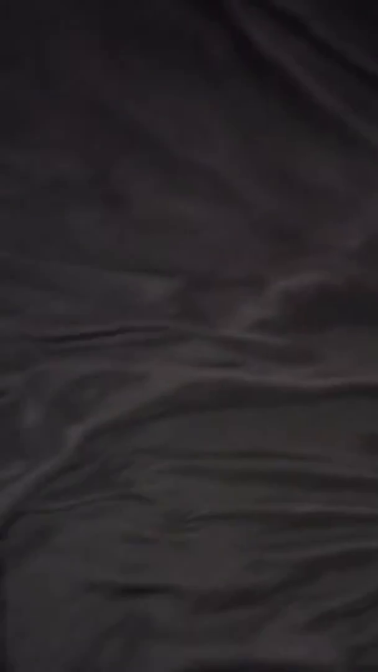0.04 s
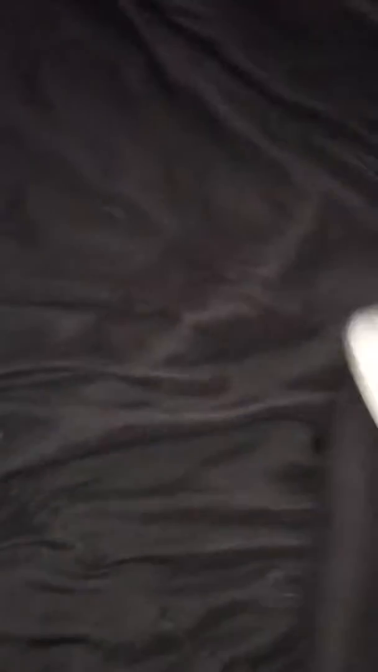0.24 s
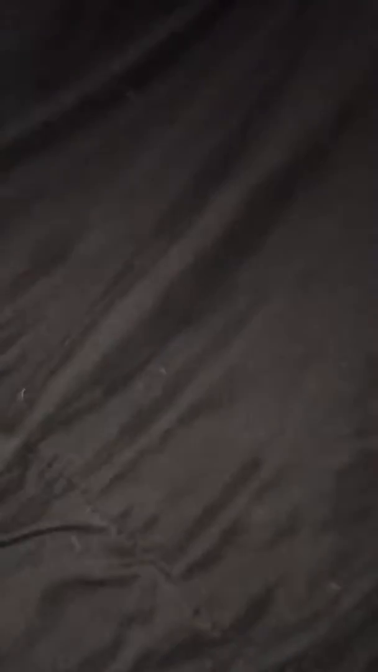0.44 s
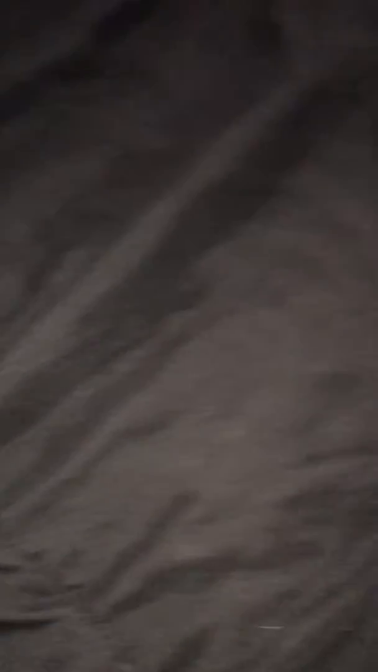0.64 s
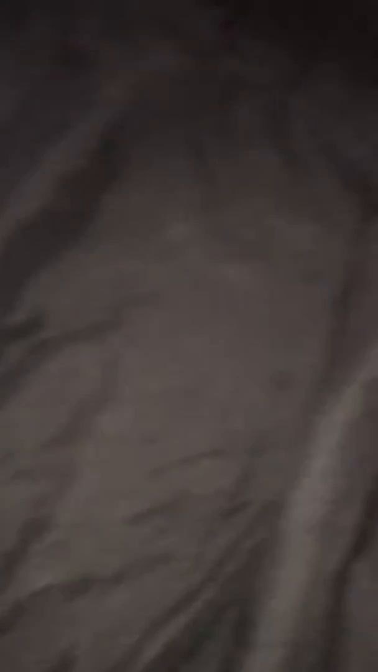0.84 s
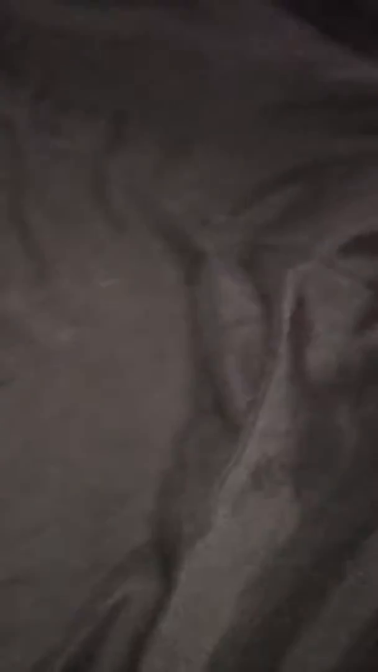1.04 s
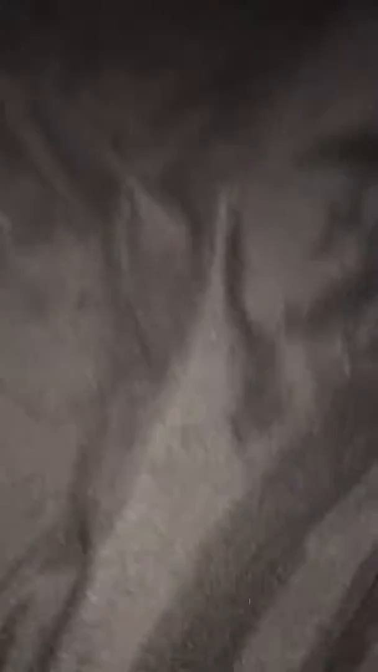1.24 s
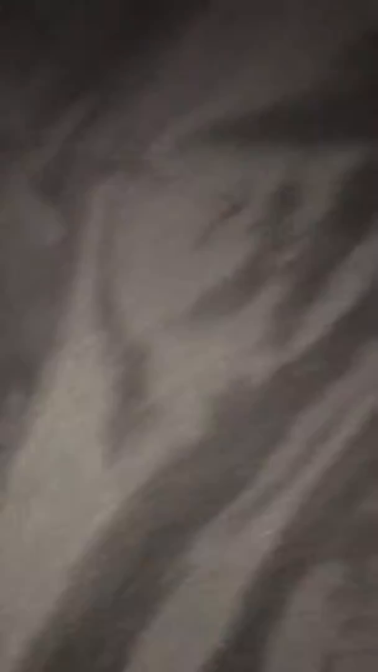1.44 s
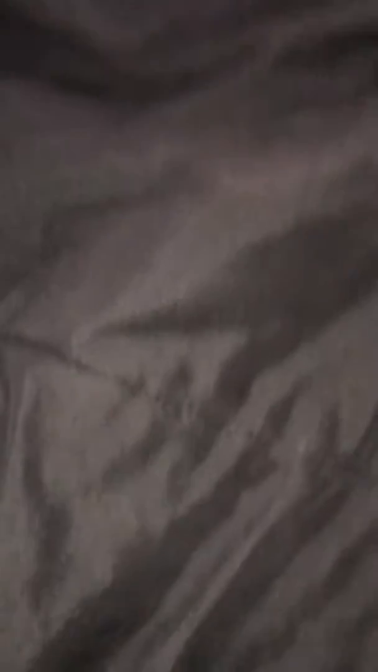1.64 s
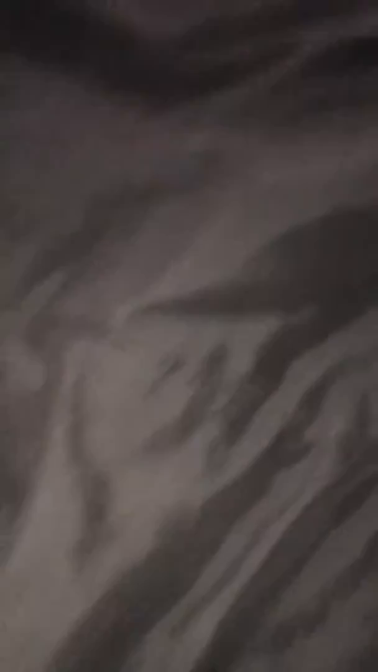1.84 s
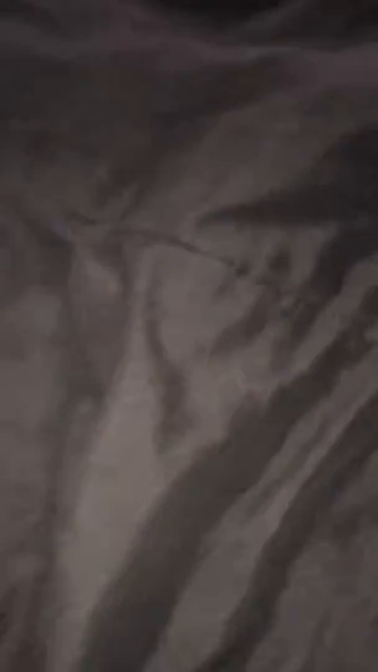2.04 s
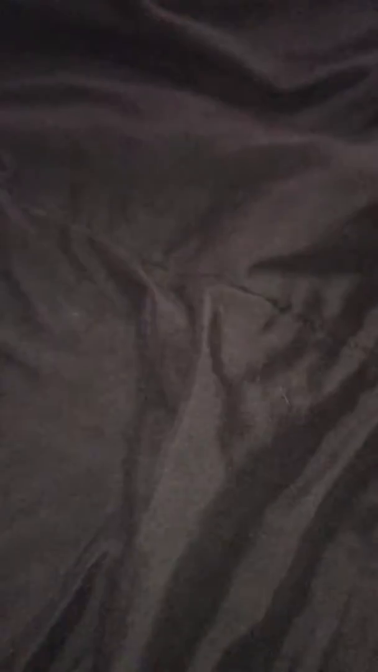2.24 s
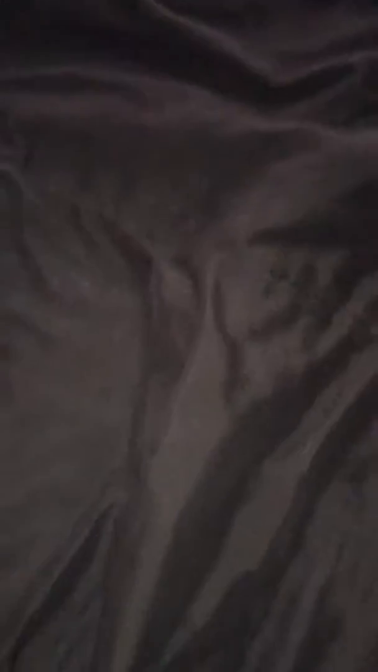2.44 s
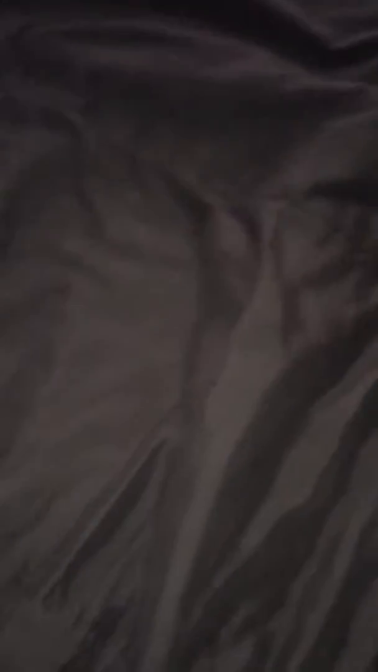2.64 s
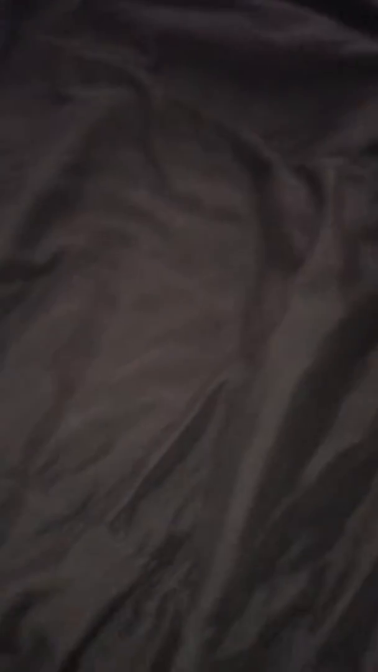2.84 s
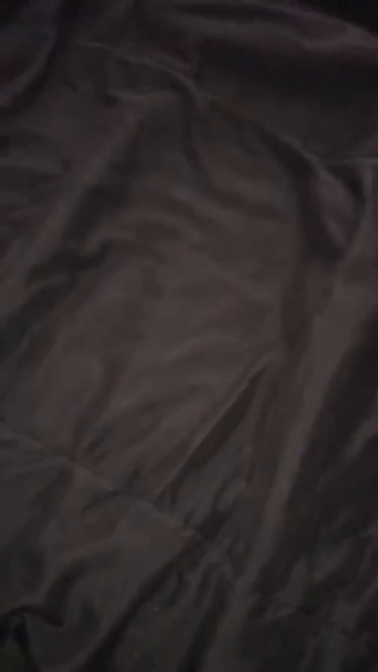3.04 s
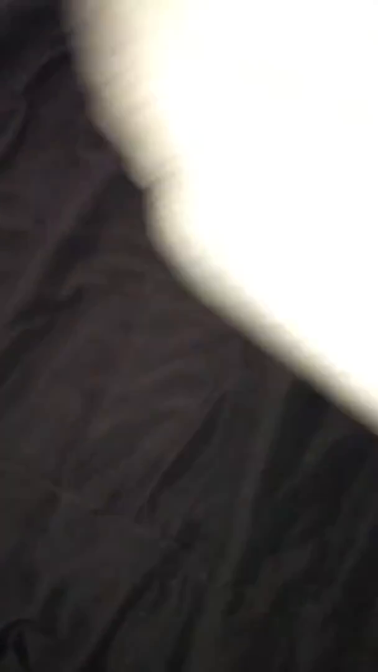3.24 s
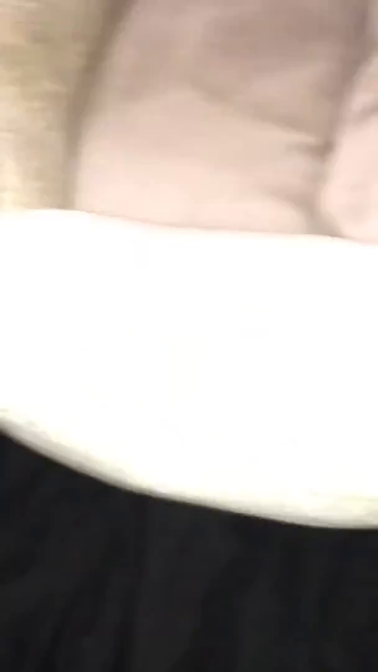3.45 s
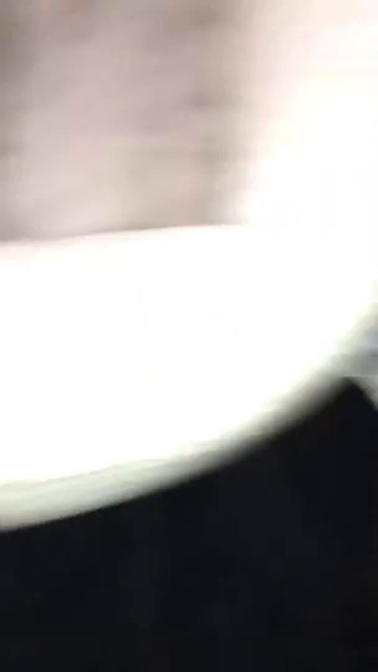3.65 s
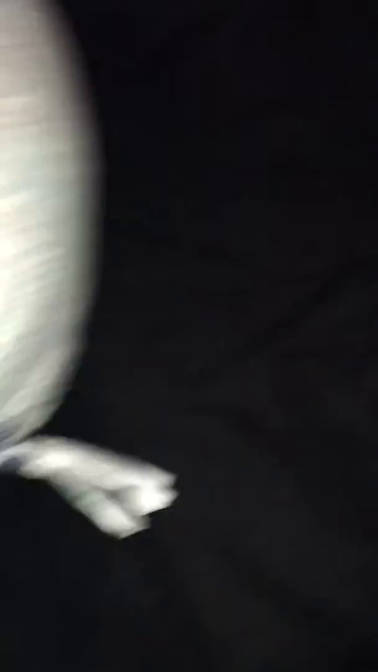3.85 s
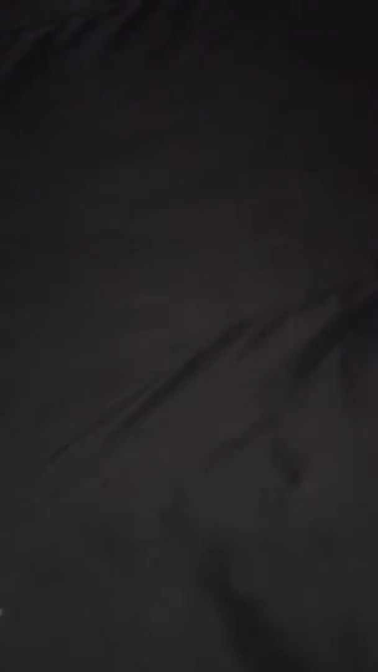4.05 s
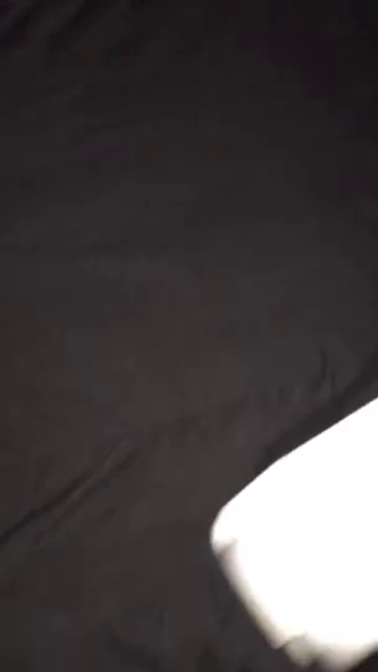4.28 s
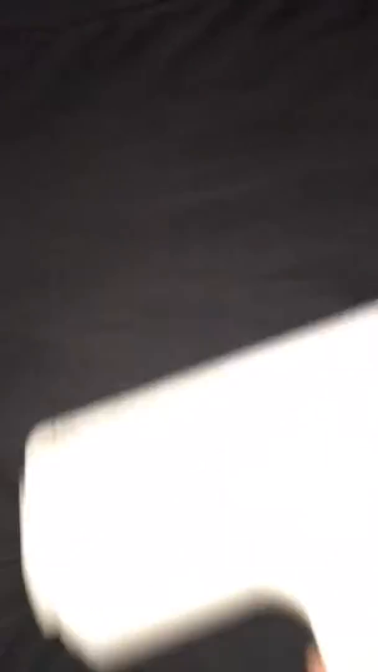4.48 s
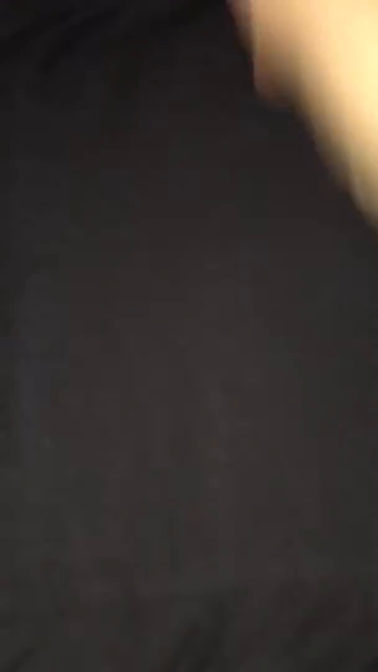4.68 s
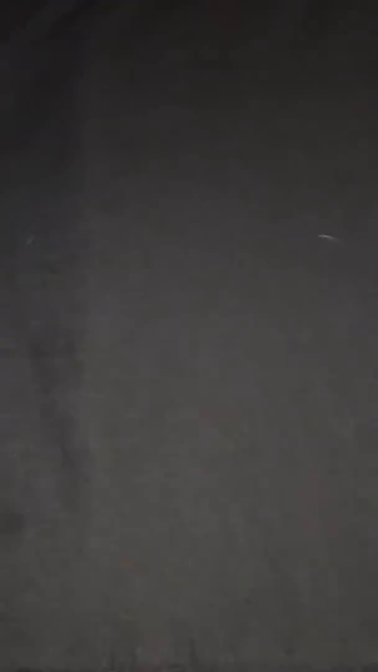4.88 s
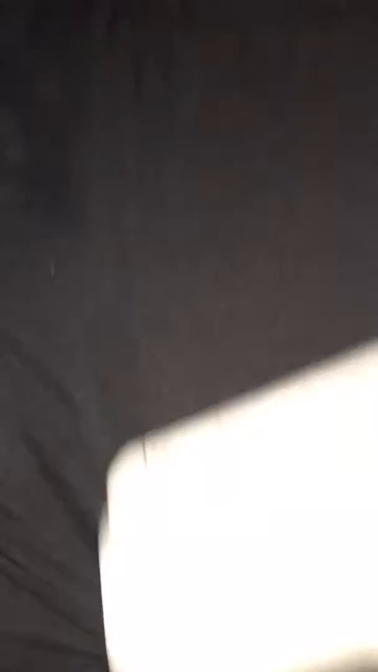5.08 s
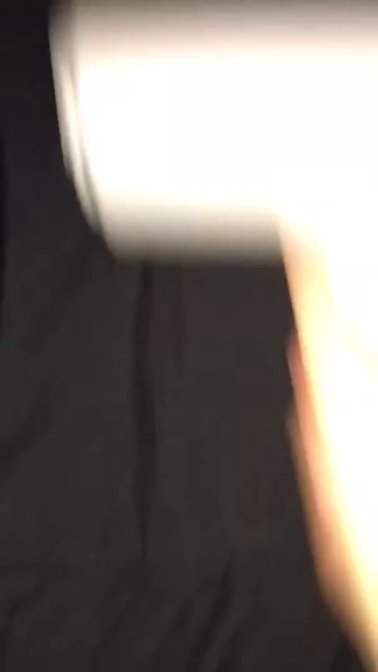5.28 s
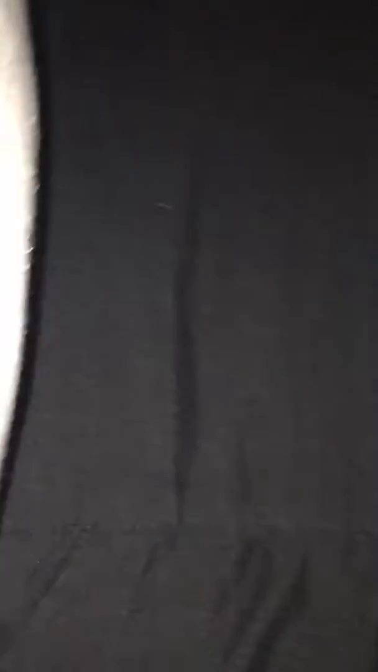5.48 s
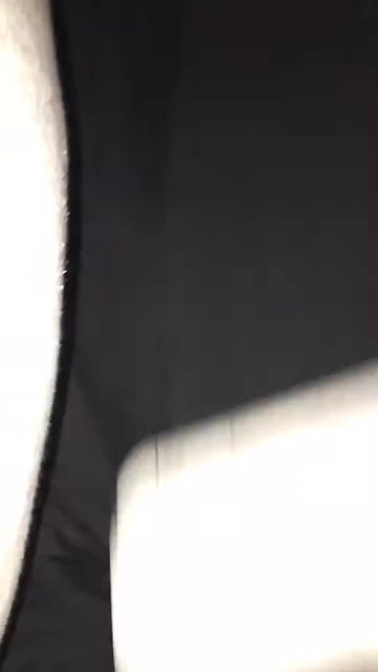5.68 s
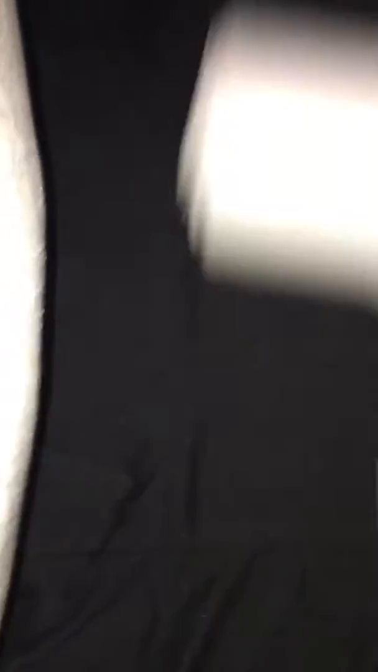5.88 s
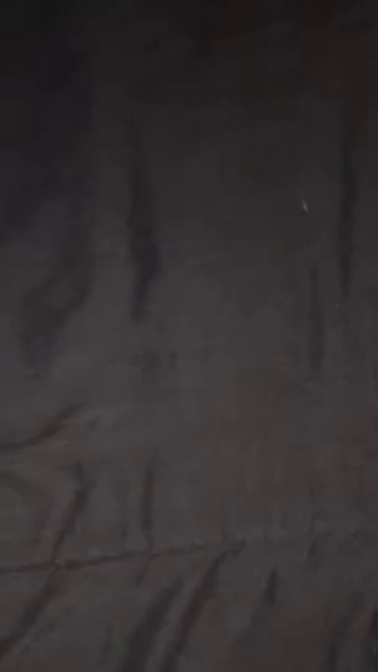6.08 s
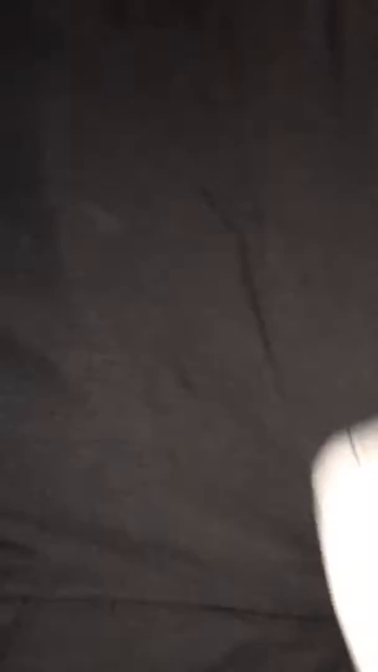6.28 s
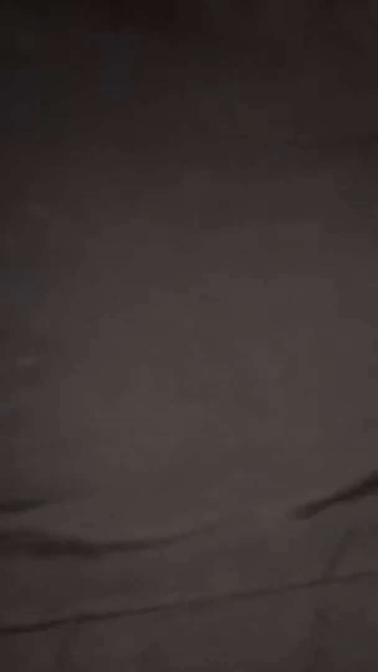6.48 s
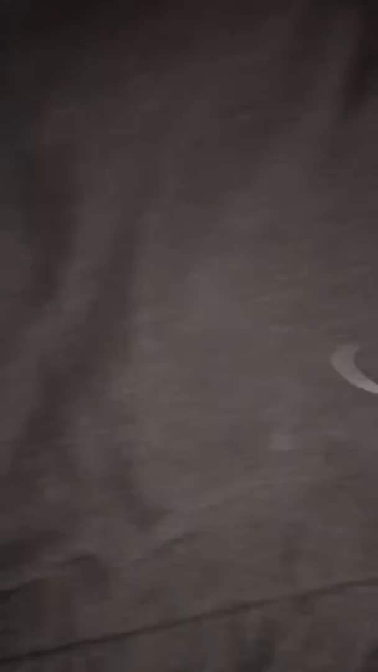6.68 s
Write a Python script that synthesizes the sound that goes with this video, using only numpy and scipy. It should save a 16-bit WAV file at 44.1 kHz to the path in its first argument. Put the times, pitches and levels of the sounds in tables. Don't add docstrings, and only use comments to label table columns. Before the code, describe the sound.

Very close in a quiet, soft bedroom, a hollow plastic lint remover is pushed back and forth over cloth. Each turn gives a sharp, dry clack; between turns come velvety scraping, bumping creases and gritty hiss. After about two and a half seconds it nearly stops, leaving faint hum, small ticks, a cushion rustle and soft thuds. Then faster, louder strokes resume until the end.

```python
import sys
import numpy as np
from scipy import signal
from scipy.fft import rfft, irfft
from scipy.io import wavfile
from scipy.ndimage import uniform_filter1d

SR = 44100
rng = np.random.default_rng(int(sys.argv[2]) if len(sys.argv) > 2 else 0)


def store_pcm(level_fs):
    pcm = np.round(np.clip(level_fs, -1, 1) * 32767).astype(np.int16)
    wavfile.write(sys.argv[1], SR, np.atleast_2d(pcm).T)


def decibels_to_gain(level_db):
    exponent = np.asarray(level_db, float) / 20
    return 10 ** exponent


N = 296352

# pitch_hz, level_db, t60_s
CAVITY_MODES = [(449, 8, 0.004), (653, 11.5, 0.01), (877, -8.5, 0.023)]
WALL_MODES = [(1063, 1.5, 0.0084), (1317, -0.8, 0.023), (1480, -2, 0.0089), (1740, 2.5, 0.011),
              (1940, 1.3, 0.0095), (2233, 1.3, 0.011), (2640, 2, 0.0074), (2850, 4, 0.0068)]
BLADE_MODES = [(3210, 5, 0.0029), (4066, 2, 0.0049), (4635, -4, 0.0085), (5380, 1.5, 0.0025),
               (6190, 1.5, 0.004), (6790, 1.5, 0.0027), (7520, -3, 0.0034), (9330, -3, 0.0026),
               (12530, -25, 0.0011)]
HANDLE_MODES = [(800, -13, .012), (1288, 8.5, 0.011), (1870, -4, 0.011), (2230, -7, 0.016),
                (2600, -7, 0.016), (3260, -14, 0.016)]
# start_s, peak_db, cavity_db, bright_db, favoured_wall_hz
FLIPS = [(0.23, -12.5, -7, -14, 996), (0.341, -21, -14, -8, 1400), (0.681, -20.5, -9, -19, 1080),
         (1.005, -3.5, -9, -10, 1635), (1.7, -27.5, -15, -23, 1880), (1.764, -11.5, -13.5, -12.5, 1480),
         (2.023, -31.5, -3.5, -20, 1940), (2.608, -22.5, -17.5, -17.5, 2540), (4.428, -19, -30, -25, 1055),
         (4.519, -10, -9.5, -13, 1145), (4.969, -17, -5.5, -10, 2130), (5.291, -3.5, -8, -8.5, 1150),
         (5.602, -10, -11.5, -15, 2040), (5.88, -2.5, -10.5, -10.5, 1480), (6.208, -6, -11.5, -9, 2310),
         (6.488, -7, -8, -11.5, 1490)]
# start_s, peak_db, cavity_db, bright_db
REBOUNDS = [(0.237, -18, -22, -24), (0.352, -17.5, -12, -14), (0.415, -30, -13, -26),
            (0.688, -28, -14, -11), (1.012, -28, -10, -25), (2.031, -38.5, -15, 0), (4.432, -33, -12, -17),
            (4.539, -29.5, -16, -3), (4.566, -32, -4, -13), (4.975, -29.5, -1, -0.5), (5.0, -29, -17, -22),
            (5.611, -30, -2, -6), (5.642, -27, -9, -30), (5.677, -39, -19, -12), (6.253, -30, -1, -16),
            (6.4875, -13, -21, -32), (6.495, -27.5, 0, 3.5)]
# start_s, peak_db, cavity_db, bright_db
SEAMS = [(0.125, -38.5, -15, -27), (0.153, -32, -24, -14), (0.168, -48, -23, -5), (0.818, -33.5, -8, -34),
         (0.864, -25.5, -38, -19), (0.915, -33.5, -31, 0), (0.951, -37, -5, -15), (1.142, -34, -29, -4),
         (1.173, -57, 17, -30), (1.195, -35, -9, -21), (1.222, -32, -12, -16), (1.42, -38, -27, -26),
         (1.479, -32, -12, -37), (1.492, -29.5, -21, -16), (1.818, -30, -23, -14), (1.847, -33, -12, -10),
         (4.716, -24, -7.5, -20), (4.798, -34, -15, -4), (4.928, -32.5, -6, -27), (5.227, -48, 6, -24),
         (5.421, -32, -1.5, -15), (5.56, -28.5, -5, -19), (5.684, -22.5, -0.5, -25), (5.722, -32, 2.5, -30),
         (5.819, -52, 14.5, -18), (5.841, -30.5, -9, -11), (6.024, -29, -4, -8.5), (6.17, -27.5, -18, -25),
         (6.43, -46, 6, -18.5)]
# start_s, peak_db, cavity_db, bright_db
FUMBLES = [(2.192, -37, -14, -16), (2.23, -34, -38, -34), (2.267, -43, -23, -5), (2.407, -38, -27, -28),
           (2.432, -44.5, -23, -13), (2.791, -36, -13, -26), (2.806, -46, 7, -26), (2.868, -41, -16, -32),
           (2.909, -40.5, -16, -30), (3.036, -63, -11, -3.5), (3.314, -41, -5, -25), (3.394, -65, -15, -3),
           (3.614, -55, 6, -15), (3.715, -40, -10, -20)]
# start_s, peak_db, pitch_hz, t60_s
EDGE_RINGS = [(0.341, -29, 6115, .012), (0.682, -36, 4430, .012), (0.916, -36, 2150, 0.013),
              (0.916, -34, 5900, .01), (1.006, -15, 2160, 0.021), (1.144, -42, 6100, .012),
              (1.144, -42, 3380, .012), (1.766, -20, 4680, 0.011), (1.766, -23.5, 2680, 0.012),
              (1.848, -39, 6070, 0.01), (2.031, -34, 4460, 0.012), (2.609, -37, 1790, .012),
              (4.521, -30.5, 7800, 0.013), (4.521, -24, 3350, 0.014), (4.799, -41, 6300, .012),
              (4.799, -42, 2150, .012), (4.97, -32, 8800, 0.011), (5.292, -10.5, 5560, 0.011),
              (5.605, -26, 3410, 0.013), (5.605, -25, 4890, .012), (5.605, -27, 4030, 0.014),
              (6.208, -21.5, 1180, 0.027), (6.212, -19, 1130, 0.015), (1.006, -19.5, 3460, 0.014),
              (5.881, -14, 686, 0.006), (6.208, -16, 2820, 0.017), (6.208, -18, 1970, 0.012),
              (6.489, -8.5, 1480, 0.013), (6.489, -17.5, 3200, 0.017), (6.489, -17.5, 3580, 0.015),
              (6.491, -21, 1500, 0.017), (1.765, -26, 3180, 0.015), (5.602, -28, 1980, 0.0062),
              (2.021, -34.5, 1970, 0.011), (5.292, -14, 680, 0.033)]
# start_s, length_s, speed_db, speed_change_db, drag_over_speed_db
STROKES = [(0.0, 0.025, -48, -2, 3), (0.05, 0.032, -56, -4.5, -1), (0.181, 0.11, -58, 6, 4.5),
           (0.34, 0.37, -46, -15.5, 3), (0.707, 0.17, -53.5, 2, 4), (1.006, 0.27, -49.5, -11.5, 4.5),
           (1.3, .14, -65, -6, -1), (1.47, 0.18, -62.5, 1.5, 9), (1.778, 0.093, -52, -6, 7.5),
           (1.962, .06, -65.5, 6, 3), (2.027, 0.27, -59, 0.5, 7.5), (2.332, 0.05, -69, -2, 6),
           (2.62, 0.021, -70, -3, 16), (2.813, 0.077, -86, 2.5, 20.5), (3.135, 0.18, -76, -6, 22),
           (3.424, 0.031, -78.5, -5, 19.5), (3.61, 0.03, -82, -3, 19.5), (4.434, 0.071, -64, 5, 10),
           (4.509, 0.29, -48, -1.5, 1), (4.803, 0.046, -55.5, -2, 1.5), (4.982, 0.18, -49, 2, 3),
           (5.293, 0.2, -45.5, -12, 2.5), (5.617, 0.13, -48, 2, 4.5), (5.88, 0.17, -46.5, -4, 4),
           (6.07, 0.042, -57, 0.5, 6.5), (6.221, 0.13, -45.5, -2.5, 8.5), (6.357, 0.031, -47, -2, 5),
           (6.47, 0.1, -49.5, 1, 3.5), (6.62, 0.054, -49, -3, 3)]
# start_s, length_s, bump_db, change_db
CREASES = [(0.0, .02, -39, 1), (0.24, 0.27, -43, 3.5), (0.68, .005, -39.5, 3), (0.74, 0.13, -42, 3.5),
           (1.01, 0.011, -38, 0), (1.08, 0.13, -42, 3.5), (1.46, 0.24, -42, -10), (1.78, 0.045, -41, 8.5),
           (2.03, 0.12, -44, -1.5), (2.8, 0.03, -54.5, 5), (3.26, 0.075, -51.5, 2),
           (3.41, 0.028, -45.5, 1.5), (3.62, 0.017, -49, 1), (3.975, .01, -53.5, -2),
           (4.035, 0.038, -53.5, 1), (4.53, 0.12, -35, -9), (4.68, 0.029, -33.5, 3.5),
           (4.81, .02, -38.5, -4), (4.975, 0.0091, -33.5, -7), (5.04, 0.1, -30.5, -3.5),
           (5.3, 0.11, -37, 6), (5.61, 0.13, -30.5, 2), (5.89, 0.14, -36.5, 6), (6.21, 0.17, -30, 1),
           (6.49, 0.17, -37, -0.5), (6.67, 0.02, -41, -12)]
# start_s, length_s, drop_db
HALTS = [
    (0.09, 0.047, 1.5),
    (0.925, .04, 0.5),
    (1.663, 0.032, 3),
    (5.197, 0.026, 1),
    (5.8, 0.028, 3),
    (6.117, 0.083, 4),
    (6.394, 0.046, 5),
]
# pitch_hz, density_db (per Hz)
BUMP_COLOUR = [(18, -38), (30, -22.5), (54, 0), (91, -3), (173, 2), (247, -2.5), (284, -4.5), (327, -8),
               (500, -14.5), (650, -33.5), (1100, -120)]
SCRAPE_COLOUR = [(180, -31.5), (300, -3.5), (502, -10.5), (669, -1), (726, -4), (1600, -10), (2120, -9),
                 (2940, -18), (3500, -18), (4550, -43.5), (7700, -120)]
HISS_COLOUR = [(1650, -20), (2800, -0.5), (3380, 0), (3940, -3.5), (4600, 0), (4950, -2), (6570, -5.5),
               (7550, -7.5), (9130, -7), (10800, -9.5), (12700, -9), (15100, -13), (16000, -11.5)]
# start_s, peak_db, pitch_hz,
# t60_s
SHORT_TONES = [(0.374, -36, 1180, 0.015), (0.348, -37, 3180, 0.014), (0.976, -50, 5810, .03),
               (1.075, -43, 5330, .015), (1.522, -45, 1640, .015), (1.608, -42, 1280, .015),
               (1.754, -36, 1500, .012), (2.284, -40, 2440, .012), (2.3, -35, 2600, .012),
               (2.692, -52.5, 990, .015), (2.831, -50, 1420, .012), (2.91, -59, 4900, .01),
               (3.035, -58, 7800, .01), (3.086, -58, 5440, 0.011), (3.137, -49, 5900, .012),
               (3.156, -55, 5700, .012), (3.185, -54, 8200, .01), (3.325, -48, 1500, .012),
               (4.482, -42, 1460, .012), (4.505, -40, 2150, .012), (4.604, -45, 2550, .012),
               (4.772, -44, 5470, .012), (4.833, -43, 2030, .015), (4.951, -42, 3160, .012),
               (5.108, -40, 1500, 0.013), (5.643, -22, 900, .006), (5.677, -38, 7000, .01),
               (5.677, -45, 8700, .01), (5.7225, -19.5, 800, 0.0062), (3.716, -32, 2500, 0.0029),
               (3.716, -50, 3780, .003), (2.869, -46, 3000, .004), (2.244, -34, 1350, 0.01),
               (2.318, -40, 2200, .005), (2.432, -54.5, 4700, .003), (4.567, -36, 3500, .004),
               (0.43, -44, 6000, .004), (6.261, -32, 1270, 0.015), (6.327, -40, 1100, .012),
               (6.345, -43, 3370, 0.022), (6.6, -41, 9300, 0.014), (6.638, -41, 4300, .012),
               (3.035, -52, 12500, 0.0033), (3.097, -63, 12600, .01), (3.394, -48, 11300, .002),
               (3.394, -46, 9000, .002), (3.394, -49, 13500, .002), (0.2275, -26, 900, 0.0094),
               (0.359, -27.5, 1610, 0.015), (5.6845, -19, 1200, 0.0048)]
# start_s, length_s,
# level_db, pitch_hz, width_hz
CLOTH_BANDS = [(0.605, .012, -62, 2750, 250), (0.626, .015, -53, 2550, 200), (2.282, 0.034, -53, 2600, 1200),
               (2.622, .04, -60, 2410, 1200), (2.8, 0.036, -55, 620, 400), (3.409, .04, -56, 260, 200),
               (3.62, 0.029, -56.5, 420, 400), (0.736, 0.076, -56, 5160, 900), (2.1, 0.043, -62, 4500, 300),
               (4.6, 0.075, -57, 2100, 300), (4.754, 0.12, -56, 2150, 250), (4.8, 0.065, -61, 4450, 500),
               (5.032, 0.17, -62, 2150, 300), (5.027, .13, -59, 4600, 400), (6.037, .07, -60, 4300, 400),
               (6.25, .1, -50, 6500, 1300), (6.27, 0.14, -60, 3280, 700), (3.084, .09, -70, 5740, 900),
               (0.049, .04, -52, 2600, 1500), (3.6, 0.13, -71, 3750, 2000), (4.0, .25, -74, 3500, 2490),
               (6.631, 0.023, -46.5, 1190, 900), (2.215, .017, -57, 4800, 2400)]
# start_s, peak_db, pitch_hz, t60_s
THUDS = [(0.84, -58, 137, 0.086), (2.178, -33.5, 113, 0.066), (3.318, -43, 119, 0.072),
         (3.43, -46, 123, 0.13), (3.411, -37.5, 202, 0.084), (3.44, -42.5, 110, .09),
         (3.634, -43, 300, .04), (3.619, -48.5, 218, 0.084), (3.93, -44.5, 46, 0.25),
         (4.033, -33, 58, 0.12), (4.05, -33.5, 139, 0.056), (4.169, -45, 53.4, 0.12),
         (4.719, -9, 155, 0.024)]
# start_s, length_s, creak_db, change_db
CREAKS = [
    (2.193, 0.016, -38.5, -4.5),
    (2.238, 0.018, -49, 11),
    (2.27, 0.047, -42.5, -3),
]
# start_s, length_s, rustle_db, change_db
RUSTLES = [
    (3.085, .03, -69, -3),
    (3.122, 0.16, -59, -5.5),
    (3.295, 0.056, -63.5, -1),
    (3.39, 0.08, -66, -8.5),
    (4.0, 0.22, -77.5, 4.5),
]
# pitch_hz, density_db (per Hz)
COVER_COLOUR = [(2500, -6.5), (4500, -6.5), (5800, -6.5), (7500, -4.5), (9500, -6), (10500, -9.5),
                (12500, -8), (15500, -13.5), (16500, -33)]
ROOM_COLOUR = [(22, -40), (40, -7), (65, -1.5), (100, -14.5), (160, -13.5), (300, -16), (600, -17),
               (1550, -18.5), (2300, -24), (3000, -29.5), (5000, -37.5), (10400, -46), (15500, -57),
               (16500, -73)]
# pitch_hz, level_db (rms)
HUM_TONES = [(53.8, -74.5), (118.4, -63), (371.4, -68.5), (565.2, -74)]
# pitch_hz, width_hz, share (0-1)
PORT_DIPS = [(1700, 307, 0.09), (2770, 262, 0.29), (4850, 270, 0.42), (7500, 600, 0.23), (10400, 530, 0.44)]

FLIP_MS, REBOUND_MS, SEAM_MS, FUMBLE_MS = 2.74, 2.46, 1.65, 3.2
REBOUND_HZ, SEAM_HZ, FUMBLE_HZ = 1400, 1500, 1243
SPEED_UP_DB_S, SPEED_DOWN_DB_S = 247, 201
HUM_SPAN_S, HUM_FADE_S, HUM_OFF_DB = (2.35, 3.92), 0.068, -3


def level(x, db):
    return x * decibels_to_gain(db) / np.sqrt(np.mean(x ** 2))


def unit(x):
    return x / np.sqrt(np.sum(x ** 2, axis=-1, keepdims=True))


def colour(x, points):
    hz, db = np.transpose(points)
    f = np.maximum(np.arange(N // 2 + 1) * SR / N, 1)
    gain_db = np.interp(np.log(f), np.log(hz), db, left=-80, right=-80)
    return irfft(rfft(x) * decibels_to_gain(gain_db), N)


def walk(rate):
    k = int(SR / rate)
    held = np.repeat(rng.standard_normal(N // k + 1), k)
    return 1.3 * uniform_filter1d(uniform_filter1d(held, k), k)[:N]


def swells(table, up_db_s, down_db_s, rest_db=-90):
    start, length, db, change = np.transpose(table)[:, :, None]
    coarse = np.arange(0, N, 32)
    age = coarse / SR - start
    length = np.maximum(length, .002)
    shape = db + change * np.clip(age / length, 0, 1)
    shape += up_db_s * np.minimum(age, 0) - down_db_s * np.maximum(age - length, 0)
    return decibels_to_gain(np.interp(np.arange(N), coarse, np.maximum(shape.max(axis=0), rest_db)))


def grains(rate, spread_db):
    chance, side, luck = rng.random((3, N))
    size = np.minimum(-np.log(1 - luck), 3.5)
    return (chance < rate / SR) * np.sign(side - .5) * decibels_to_gain(spread_db * size)


def patchy(x, depth_db):
    spectrum, out = rfft(x), 0
    octave = np.log2(np.maximum(np.arange(N // 2 + 1) * SR / N, 1))
    for centre in np.arange(10.5, 14.4, 1 / 3):
        band = irfft(spectrum * np.clip(1 - 3 * abs(octave - centre), 0, 1), N)
        out = out + decibels_to_gain(depth_db * walk(14)) * band
    return out


def ring(modes, push, favoured_hz=None):
    hz, db, t60 = np.transpose(modes)[:, :, None]
    t = np.arange(2048) / SR
    luck = rng.standard_normal((2, len(modes), 1))
    hz, db = hz * (1 + .015 * luck[0]), db + 1.5 * luck[1]
    if favoured_hz:
        db = db + 9 * np.exp(-(np.log(hz / favoured_hz) / 0.089) ** 2)
    swings = np.exp(-np.log(1000) * t / t60) * np.sin(2 * np.pi * hz * t)
    answers = unit(signal.fftconvolve(swings, push[None], axes=1))
    polarity = (-1) ** np.arange(len(modes))[:, None]
    return unit(np.sum(decibels_to_gain(db) * np.sqrt(t60) * answers * polarity, axis=0))


def pings(table):
    out, t = np.zeros(N + 2048), np.arange(2048) / SR
    for (s, peak_db, hz, t60), turn in zip(table, rng.random((len(table), 1))):
        shape = (1 - np.exp(-t / .0006)) * np.exp(-np.log(1000) * t / max(t60, .002))
        i = int(s * SR)
        out[i:i + len(t)] += decibels_to_gain(peak_db + 5.5) * shape * np.sin(2 * np.pi * (hz * t + turn))
    return out[:N]


def knocks(table, chatter_ms, wall_hz=None):
    out, t = np.zeros(N + 4096), np.arange(2048) / SR
    for s, peak_db, cavity_db, bright_db, *tone_hz in table:
        age = 1e3 * t / max(chatter_ms, .3)
        luck = rng.standard_normal((2, len(t)))
        envelope = np.clip(age / 0.46, 0, 1) ** 2 * np.exp(-(0.62 * age) ** 0.93)
        contacts = envelope * luck[0] * decibels_to_gain(4.8 * luck[1])
        hit = decibels_to_gain(cavity_db + 8.5) * ring(CAVITY_MODES, contacts)
        hit += ring(WALL_MODES, contacts, wall_hz or tone_hz[0])
        hit += decibels_to_gain(bright_db + 9.0) * ring(BLADE_MODES, contacts * np.exp(-.3 * age))
        crack = np.diff(contacts, n=2, prepend=[0, 0])
        hit[:len(t)] += decibels_to_gain(bright_db + 4.0) * unit(crack)
        shove = np.exp(-t / 0.0088) * np.sin(2 * np.pi * 200 * t)
        hit[:len(t)] += decibels_to_gain(cavity_db - 3.5) * unit(shove)
        i = int((s - .0007) * SR)
        out[i:i + len(hit)] += decibels_to_gain(peak_db + 11.5) * hit
    return signal.sosfilt(signal.butter(2, [120, 10930], "band", fs=SR, output="sos"), out[:N])


def shell():
    turns = knocks(FLIPS, FLIP_MS) + knocks(REBOUNDS, REBOUND_MS, REBOUND_HZ)
    return turns + knocks(SEAMS, SEAM_MS, SEAM_HZ) + knocks(FUMBLES, FUMBLE_MS, FUMBLE_HZ)


def rolling():
    speeds = [row[:4] for row in STROKES]
    drags = [(s, length, db + drag_db, change) for s, length, db, change, drag_db in STROKES]
    press = walk(45)
    flicker_db = np.array([2 * press, 1.5 * press + 1.5 * walk(90), .8 * press + walk(90)])
    bumps = level(colour(grains(400, 1.7), BUMP_COLOUR), -5.0) * swells(CREASES, 326, 255, rest_db=-61)
    slips = grains(1800, 3.8)
    scrape = level(colour(slips, SCRAPE_COLOUR), -1.324) * swells(drags, 255.5, 210, rest_db=-66)
    weave = patchy(level(grains(6140, 3.6) + 0.23 * slips, -1) + rng.standard_normal(N), 2.2)
    hiss = level(colour(weave, HISS_COLOUR), 0.16)
    hiss = hiss * swells(speeds, SPEED_UP_DB_S, SPEED_DOWN_DB_S, rest_db=-77)
    return np.sum(decibels_to_gain(flicker_db) * [bumps, scrape, hiss], axis=0)


def halts():
    start, length, drop_db = np.transpose(HALTS)[:, :, None]
    age = np.arange(0, N, 32) / SR - start
    depth = np.clip(np.minimum(age / .006, (length - age) / .02 + 1), 0, 1)
    db = -np.sum(drop_db * depth, axis=0)
    return decibels_to_gain(np.repeat(db, 32)[:N])


def grit():
    damped_walls = [(hz, db + 1.0, t60 * 0.86) for hz, db, t60 in WALL_MODES]
    tick = ring(damped_walls + BLADE_MODES, np.ones(1))[:1024]
    ticks = signal.oaconvolve(grains(160, 5.0), tick)[:N]
    speeds = [row[:4] for row in STROKES]
    return level(ticks, -6) * swells(speeds, SPEED_UP_DB_S, SPEED_DOWN_DB_S) * halts()


def cloth_bands():
    out, t = np.zeros(N), np.arange(N) / SR
    slips = level(grains(3000, 1.9), 0)
    for s, length, db, hz, width_hz in CLOTH_BANDS:
        span = slice(int((s - .05) * SR), int((s + length + .05) * SR))
        band = signal.lfilter(*signal.iirpeak(hz, hz / width_hz, SR), slips[span])
        band = signal.lfilter(*signal.iirpeak(hz, hz / width_hz / 2, SR), band)
        fade = np.clip(np.minimum(t[span] - s, s + length - t[span]) / 0.0092 + 1, 0, 1)
        out[span] += level(band, db) * fade ** 2
    return out


def thuds():
    out, t = np.zeros(N), np.arange(SR // 5) / SR
    for s, peak_db, hz, t60 in THUDS:
        shape = (1 - np.exp(-t / 0.007)) * np.exp(-np.log(1000) * t / t60)
        i = int(s * SR)
        out[i:i + len(t)] += decibels_to_gain(peak_db + 3.5) * shape * np.sin(2 * np.pi * hz * t)
    return out


def creak():
    return level(ring(HANDLE_MODES, grains(450, 2.4))[:N], 0) * swells(CREAKS, 2490, 1500)


def cushion():
    crackle = level(grains(2500, 3.0), -2) + rng.standard_normal(N)
    rustle = level(colour(patchy(crackle, 2.92), COVER_COLOUR), 0)
    return rustle * swells(RUSTLES, 500, 350) * decibels_to_gain(2.5 * walk(70))


def bedroom(x, t60_s=0.14, wet_db=-21):
    t = np.arange(SR // 3) / SR
    tail = rng.standard_normal(len(t)) * np.exp(-np.log(1000) * t / t60_s) * (t > .004)
    tail = signal.lfilter([1], [1, -.6], tail)
    return x + decibels_to_gain(wet_db) * signal.fftconvolve(x, unit(tail))[:N]


def room_floor():
    t = np.arange(N) / SR
    hum = np.zeros(N)
    for hz, db in HUM_TONES:
        loudness = np.sqrt(2) * decibels_to_gain(db + 1.2 * walk(14))
        hum += loudness * np.sin(2 * np.pi * hz * t + .6 * walk(10))
    away = np.clip(np.maximum(HUM_SPAN_S[0] - t, t - HUM_SPAN_S[1]) / HUM_FADE_S, 0, 1)
    air = level(colour(rng.standard_normal(N), ROOM_COLOUR), -58)
    return air + hum * decibels_to_gain(HUM_OFF_DB * away)


def scene():
    roller = bedroom(shell() + creak()) + pings(EDGE_RINGS)
    cloth = rolling() * halts() + grit() + pings(SHORT_TONES) + cloth_bands()
    return (roller + cloth + thuds() + cushion() + room_floor())[None]


def low_pass(x):
    return signal.sosfilt(signal.butter(12, 16830, fs=SR, output="sos"), x)


def record(dry):
    x = np.tanh(1.11 * dry) / 1.021
    for hz, width_hz, share in PORT_DIPS:
        x = x - share * signal.lfilter(*signal.iirpeak(hz, hz / width_hz, SR), x)
    soft = signal.sosfilt(signal.ellip(8, .2, 60, 15750, fs=SR, output="sos"), x)
    mix = soft + decibels_to_gain(-38) * (x - soft)
    return low_pass(mix)


dry = scene()
out = record(dry)
store_pcm(out)
```